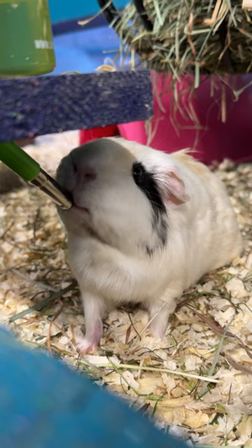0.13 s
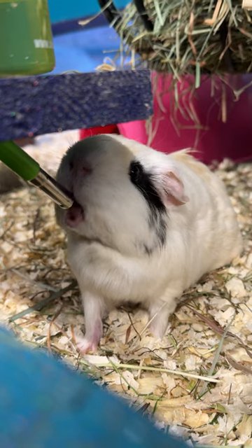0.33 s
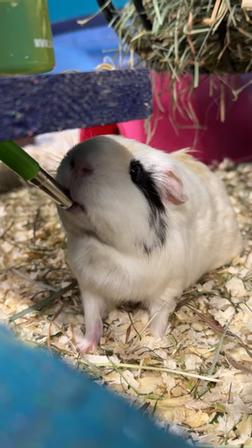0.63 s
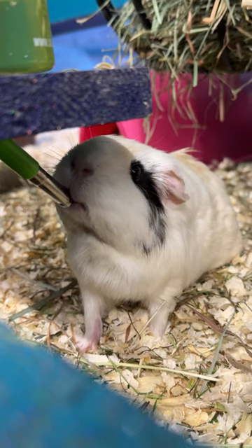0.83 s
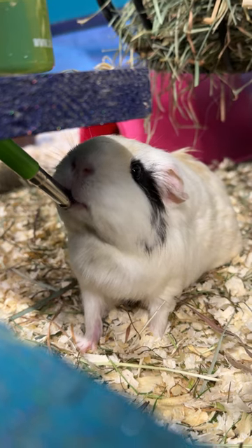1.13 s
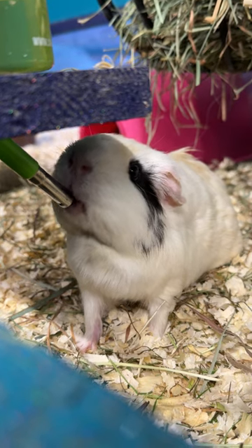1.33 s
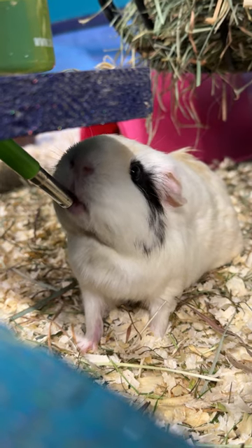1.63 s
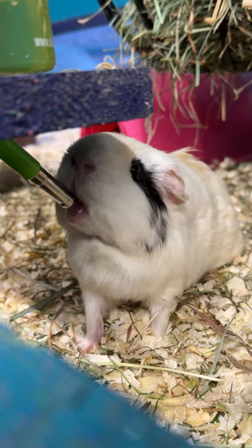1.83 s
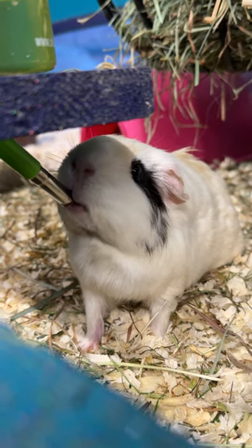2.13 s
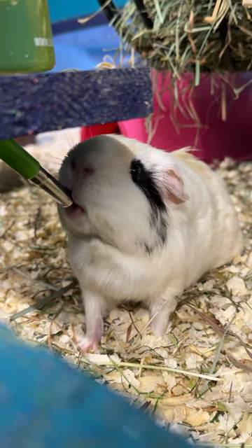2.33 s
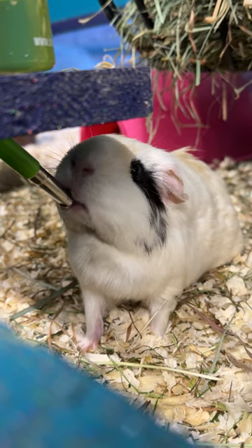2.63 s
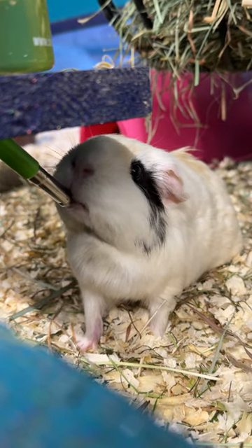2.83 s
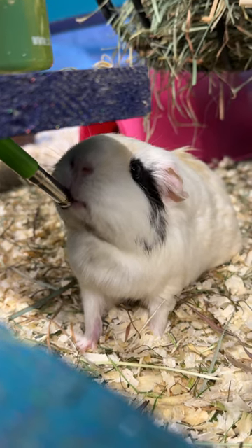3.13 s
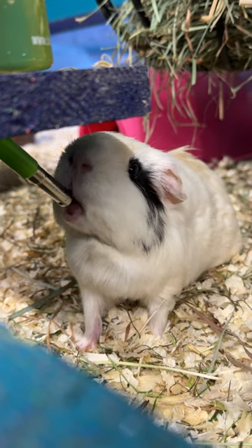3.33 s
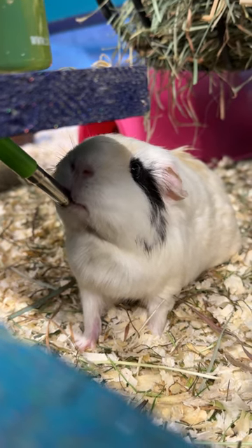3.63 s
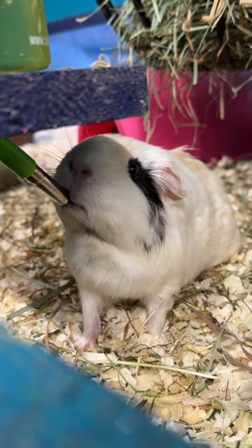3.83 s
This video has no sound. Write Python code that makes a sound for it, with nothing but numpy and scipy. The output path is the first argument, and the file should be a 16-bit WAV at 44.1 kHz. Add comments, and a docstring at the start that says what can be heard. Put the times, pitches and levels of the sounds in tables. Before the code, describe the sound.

Ball in a steel water spout snaps and rattles in uneven bursts, with late bumps nearby.

```python
"""Metallic clicks and rattles in bursts: a guinea pig drinks from a bottle in its cage, in a quiet room.
Each lick snaps the steel ball in the spout, which knocks the tube and rattles: noise cracks plus decaying sines.
The tongue's rubs and the bedding's rustles are coloured noise with tiny pops; the fan is narrow-band noise.
Dull bumps that reach the microphone, strongest near the end, are low sines with a noise thud."""
import sys
import numpy as np
from scipy import signal
from scipy.fft import rfft, irfft
from scipy.io import wavfile
from scipy.ndimage import uniform_filter1d

SR = 44100
rng = np.random.default_rng(int(sys.argv[2]) if len(sys.argv) > 2 else 0)


def transcribe(signal):
    """Save signal, clipped to [-1, 1], as a 16-bit WAV file at the path in sys.argv[1]."""
    frames = np.atleast_2d(signal).T
    limited = np.clip(frames, -1, 1)
    pcm = np.round(limited * 32767).astype(np.int16)
    wavfile.write(sys.argv[1], SR, pcm)


N = 176400
T_S = np.arange(N) / SR
HZ = np.fft.rfftfreq(N, 1 / SR) + 1e-6  # offset keeps log(HZ) finite

# Room air spectrum, shape only. Each row: frequency in Hz, gain in dB.
AIR_SHAPE = [(25,-13.5),(70,2.5),(200,-3),(360,-3),(620,-14),(1440,-23),(2550,-31),(6900,-37.5),(15000,-32.5)]
AIR_RMS_DB = -49.5
# Fan hums. Each row: centre in Hz, half-width at half gain in Hz, rms level in dB.
FAN_HUMS = [(189.6,13.3,-55),(300.3,1.85,-57.5),(343.6,3.2,-57.5)]
# Stereo width of diffuse sound. Each row: frequency in Hz, side over mid in dB.
SIDE_OVER_MID = [(50,-30),(250,-26.5),(500,-6),(1200,-7.5),(3500,-18.5),(12000,13)]
# Phase between the microphone ports. Each row: frequency in Hz, lead of the left in radians.
PORT_PHASE = [(5000,0),(6700,-1.3),(12400,-3.14),(16000,-4.1)]

# Bumps. Each row: start in seconds, boom in dB, overtone in dB (both before the swell), boom pitch in Hz.
BUMPS = [(0.624,-30,-37,47),(0.669,-29.5,-55,50.5),(.895,-36.5,-41,100),(0.976,-32.5,-63,53.5),(1.228,-50,-37,89.5),(3.709,-21.5,-31,80),(3.747,-14.5,-24.5,76),(3.81,-25,-38,78.5),(3.863,-19,-53,86.3),(3.944,-27.5,-58,83)]
# Thud spectrum, shape only. Each row: frequency in Hz, gain in dB.
THUD_SHAPE = [(20,-30),(52,14.5),(110,16),(270,-6),(900,-58)]
BUMP_RISE_S, BUMP_DECAY_S = 0.02, 0.033  # time constants
OVERTONE_HZ, THUD_RE_BOOM_DB = 191.5, -7

# Rustles of fur and bedding. Each row: start in seconds, level in dB before the swell, decay in seconds.
RUSTLES = [(2.058,-40,0.021),(2.087,-46,0.032),(2.187,-53,0.045),(2.985,-48,0.036),(3.012,-43.5,0.019),(3.193,-44,0.018),(3.221,-47,0.041),(3.678,-44,0.041),(3.729,-37,0.027),(3.811,-49,0.039)]
# Rustle spectrum, shape only. Each row: frequency in Hz, gain in dB.
RUSTLE_SHAPE = [(400,4),(1900,3.5),(2800,-1),(3900,4.5),(5500,-4),(16000,-3.5)]
# Scuffs. Each row: start in seconds, level in dB before the swell, decay in seconds, resonance in Hz.
SCUFFS = [(3.68,-44,0.02,1790),(3.707,-38,0.014,1240),(3.7287,-40.5,0.027,1770)]
RISE_PER_DECAY = 0.13
SCUFF_HALF_WIDTH_HZ, SCUFF_OVERTONE_RATIO, SCUFF_OVERTONE_DB = 310, 1.9, -10.5
# Pops in rustles, scuffs and rubs; level relative to the hiss.
POPS_PER_S, POPS_RE_HISS_DB, POP_T60_S = 190, -3.5, 0.009

# Tongue rubs along the spout. Each row: start in seconds, level in dB at mid-rub.
RUBS = [(0.203,-66.5),(.31,-73.5),(0.747,-61),(1.195,-57),(1.305,-56),(1.615,-59),(1.826,-60),(2.333,-59),(2.415,-56.5),(2.643,-59.5),(3.34,-58.5),(3.561,-58)]
RUB_S, RUB_HALF_WIDTH_HZ = 0.056, 120  # modes widen while the mouth damps them

# Clicks of ball and spout. Each row: start in seconds, gain of knock, ring and tick in dB.
CLICKS = [ (0.3992,-39,-35.5,-30.5),(.412,-35,-41.5,-35.5),(0.436,-36.5,-45,-43),(0.4579,-51,-39.5,-55),(0.4706,-43,-35.5,-39.5),(0.482,-60,-58,-48),
          (0.5326,-33.5,-39.5,-40),(0.539,-51,-44,-38),(0.5903,-42.5,-39.5,-50),(0.6133,-42.5,-43,-54),
          (0.7867,-38.5,-33.5,-31.5),(0.802,-36,-48,-46),(0.815,-40,-48.5,-48),(0.8574,-54,-46.5,-42),(0.902,-40.5,-46.5,-43),(0.9869,-45,-40.5,-50),
          (1.0609,-34.5,-36,-30.5),(1.0803,-39.5,-38,-34),(1.1069,-38.5,-41.5,-47),(1.117,-40,-41,-44),(1.1264,-36.5,-36,-43.5),(1.2988,-45,-46.5,-59),
          (1.3563,-34.5,-30.5,-29.5),(1.3716,-38,-40,-33),(1.3802,-34.5,-55,-56),(1.4134,-41,-54,-52),(1.42,-49,-44.5,-42),(1.4386,-44,-43,-40),(1.4481,-44,-42,-47),(1.545,-53,-47.5,-58),
          (1.6466,-34.5,-32,-29.5),(1.665,-36.5,-41,-32),(1.6696,-52,-42.5,-50),(1.6961,-37,-44,-51),(1.729,-37,-33.5,-42.5),(1.79,-44,-41.5,-54),
          (1.8842,-33.5,-32.5,-29.5),(1.9012,-31.5,-43.5,-33),(1.9052,-37.5,-51,-58),(1.9381,-40,-43.5,-50),(1.9669,-37,-34,-43.5),
          (2.451,-38.5,-33.5,-31.5),(2.467,-37.5,-55,-58),(2.4869,-36.5,-42,-46),(2.5098,-45.5,-42,-52),(2.5189,-46,-40.5,-35),(2.5899,-39.5,-41.5,-40),
          (2.811,-38.5,-37,-29.5),(2.83,-32,-40.5,-37),(2.8688,-41.5,-41,-49),(2.8809,-42,-38.5,-37),(2.9088,-49,-50,-65),(2.9748,-41,-44,-44.5),
          (3.0546,-35,-35,-30.5),(3.0715,-33.5,-40,-36),(3.1086,-45,-43.5,-48),(3.1175,-38.5,-37,-42.5),(3.1291,-41,-39.5,-39.5),(3.1536,-47.5,-46.5,-61),(3.3111,-48,-46,-59),
          (3.3892,-35,-33,-29.5),(3.4059,-36.5,-39.5,-33.5),(3.4542,-40.5,-37.5,-49),(3.4677,-38.5,-36,-46),(3.4908,-46,-44,-48)]
# Registers: knock, ring, tick. Each row: upper edge in Hz, rise time constant in seconds, crack in dB,
# crack t60 in seconds, cage echo in dB, cage echo t60 in seconds. Levels are relative to the click gain.
REGISTERS = [(1860,0.00076,-4.5,0.025,-9,0.22),(5720,0.00076,3,0.018,-8,0.11),(14700,0.00066,13,0.0076,-0.5,0.034)]
# Crack spectrum, shape only. Each row: frequency in Hz, gain in dB.
CRACK_SHAPE = [(350,9.5),(700,5),(4200,-1.5),(4700,-5),(6500,-4),(9500,3.5),(12300,4.5),(14000,3)]
# Modes of bottle and spout. Each row: mean pitch in Hz, level in dB relative to the other modes, t60 in seconds.
MODES = [(722,-6.5,0.037),(920,-15,0.097),(1192,-6,0.039),(1436,-2.5,0.036),(1585,-8,0.027),(2072,-16.5,0.054),(2324,-8,0.037),(2915,-1,0.019),(3230,-11,0.019),(3767,-8,0.031),(4077,-6.5,0.035)]
MODES_GAIN_DB = 3.5
# The ball never strikes the same spot twice: standard deviations per strike.
MODE_SCATTER_DB, MODE_DETUNE_SHARE, TUBE_DETUNE_SHARE = 3, 0.018, 0.01
TUBE_MEAN_HZ, TUBE_MEAN_DB, TUBE_T60_S = 3080, -11.5, 0.14  # long ring of the steel tube
# A light touch precedes each click whose tick exceeds SNAP_DB.
SNAP_DB, TOUCH_LEAD_S, TOUCH_DB = -31.5, 0.0044, -12.5
BOUNCE_MAX_GAP_S, BOUNCE_STEP_DB = 0.008, -9.5
LAG_MAX_S, LAG_SCALE_HZ = 0.00781, 848.2
ROOM_DB, ROOM_T60_S = -28, 0.42
TOP_HZ = 16100


def amp(db):
    """Decibels to gain."""
    return 10 ** (np.asarray(db) / 20)


def curve(points):
    """Gain over HZ from (Hz, dB) points, interpolated on log frequency."""
    hz, db = np.array(points, float).T
    return amp(np.interp(np.log(HZ), np.log(hz), db))


def noise(gain):
    """Noise of unit power with the given spectrum."""
    x = irfft(rfft(rng.standard_normal(N)) * gain, N)
    return x / x.std()


def swell(start_s, rise_s, decay_s):
    """Envelope that rises and dies away exponentially."""
    age_s = np.maximum(T_S - start_s, 0)
    return (1 - np.exp(-age_s / rise_s)) * np.exp(-age_s / decay_s)


def fade(t_s, t60_s):
    """Exponential fall of 60 dB in t60_s."""
    return np.exp(-np.log(1000) * t_s / t60_s)


def add(out, x, start_s):
    """Mix a short sound in at its time."""
    i = int(start_s * SR)
    out[..., i:i + x.shape[-1]] += x[..., :N - i]


def below(hz):
    """Share of the power under a soft crossover."""
    return hz ** 10 / (hz ** 10 + HZ ** 10)


def resonance(hz, half_width_hz):
    """Complex gain of one resonance over HZ."""
    return 1 / (1 + 1j * (HZ - hz) / half_width_hz)


def friction(gain):
    """Rubbing surfaces: a hiss with tiny pops of uneven size, both in the given colour."""
    hits = (rng.random(N) < POPS_PER_S / SR) * rng.standard_normal(N)
    t_s = T_S[:SR // 20]
    pop = fade(t_s, POP_T60_S) * rng.standard_normal(len(t_s))
    pops = signal.fftconvolve(hits, pop)[:N]
    pops = irfft(rfft(pops) * gain, N)
    pops_gain = amp(POPS_RE_HISS_DB)
    return (noise(gain) + pops_gain * pops / pops.std()) / np.hypot(1, pops_gain)


def diffuse(mid, side):
    """Sound from all around: alike in both ears in the bass, wide in the upper treble."""
    share = curve(SIDE_OVER_MID)
    m, s = rfft(mid), rfft(side) * share
    return irfft(np.array([m + s, m - s]) / np.hypot(1, share), N)


def ports(x):
    """The treble reaches the two microphone ports out of step."""
    turn = np.interp(HZ, *np.array(PORT_PHASE, float).T)
    return irfft(rfft(x) * np.exp(1j * np.array([turn, -turn]) / 2), N)


def air():
    """One channel of steady broadband air noise plus narrow fan hums."""
    out = amp(AIR_RMS_DB) * noise(curve(AIR_SHAPE))
    for hz, half_width_hz, db in FAN_HUMS:
        out += amp(db) * noise(1 / (1 + ((HZ - hz) / half_width_hz) ** 2))
    return out


def room():
    """Room air and fan as a diffuse field, from independent mid and side noise."""
    return diffuse(air(), air())


def bumps():
    """Soft blows: a low boom with a dull thud, and an overtone."""
    out = np.zeros(N)
    thud = amp(THUD_RE_BOOM_DB) * noise(curve(THUD_SHAPE))
    for start_s, boom_db, overtone_db, hz in BUMPS:
        turn = 2 * np.pi * (T_S - start_s)
        boom = amp(boom_db) * (np.sin(hz * turn) + thud)
        overtone = amp(overtone_db) * np.sin(OVERTONE_HZ * turn)
        out += swell(start_s, BUMP_RISE_S, BUMP_DECAY_S) * (boom + overtone)
    return out


def stroke(start_s, db, decay_s):
    """Level envelope of one rustle or scuff."""
    return amp(db) * swell(start_s, RISE_PER_DECAY * decay_s, decay_s)


def bedding():
    """Short crackly rustles, and scuffs that each ring at their own pitch and weakly above it."""
    out = sum(stroke(*row) for row in RUSTLES) * friction(curve(RUSTLE_SHAPE))
    for start_s, db, decay_s, hz in SCUFFS:
        main = resonance(hz, SCUFF_HALF_WIDTH_HZ) ** 2
        upper = resonance(SCUFF_OVERTONE_RATIO * hz, SCUFF_HALF_WIDTH_HZ) ** 2
        colour = main + amp(SCUFF_OVERTONE_DB) * upper
        out = out + stroke(start_s, db, decay_s) * friction(colour)
    return ports(out)


def tongue():
    """Soft rubs that swell and fade in the damped modes of the spout."""
    power = sum(np.abs(amp(db) * resonance(hz, RUB_HALF_WIDTH_HZ)) ** 2 for hz, db, _ in MODES)
    pressure = np.zeros(N)
    for start_s, db in RUBS:
        pressure += amp(db) * np.sin(np.pi * np.clip((T_S - start_s) / RUB_S, 0, 1))
    return ports(pressure * friction(np.sqrt(power)))


def late_lows(x):
    """Low notes build up late, by up to LAG_MAX_S, so each knock slides down."""
    phase = 2 * np.pi * LAG_MAX_S * LAG_SCALE_HZ * np.exp(-HZ / LAG_SCALE_HZ)
    return irfft(rfft(x) * np.exp(1j * phase), N)


def ringing(low_hz, high_hz):
    """Decaying modes within one register, struck a little differently each time."""
    t_s = T_S[:SR // 14]
    out = np.zeros(len(t_s))
    scatter = rng.standard_normal((len(MODES), 3))
    for (hz, db, t60_s), (size, detune, phase) in zip(MODES, scatter):
        if low_hz < hz <= high_hz:
            gain = amp(MODES_GAIN_DB + db + MODE_SCATTER_DB * size)
            struck_hz = hz * (1 + MODE_DETUNE_SHARE * detune)
            out += gain * fade(t_s, t60_s) * np.sin(2 * np.pi * (struck_hz * t_s + phase))
    return out


def tube_ring(t_s, phase):
    """One long decaying sine of the steel tube, scattered in level and pitch."""
    gain = amp(TUBE_MEAN_DB + MODE_SCATTER_DB * rng.standard_normal())
    hz = TUBE_MEAN_HZ * (1 + TUBE_DETUNE_SHARE * rng.standard_normal())
    return gain * fade(t_s, TUBE_T60_S) * np.sin(2 * np.pi * (hz * t_s + phase))


def chatter(tick, grit, count):
    """The ball bounces at uneven gaps, weaker each time."""
    out, start_s = np.zeros(N), 0
    for bounce in range(1, count + 1):
        start_s += BOUNCE_MAX_GAP_S * (1 + rng.random()) / 2
        at = rng.integers(N - len(tick))
        add(out, amp(BOUNCE_STEP_DB * bounce) * tick * grit[at:at + len(tick)], start_s)
    return out[:len(tick)]


def spout():
    """Each click is a crack plus ringing modes, echoed by the cage and then the room."""
    t_s = T_S[:SR // 3]
    near, far, low_hz = np.zeros(N), np.zeros((2, N)), 0
    for k, (high_hz, rise_s, crack_db, crack_t60_s, cage_db, cage_t60_s) in enumerate(REGISTERS):
        band = curve(CRACK_SHAPE) * np.sqrt(np.abs(below(high_hz) - below(low_hz)))
        grit = noise(band)
        walls = np.array([noise(band), noise(band)])
        attack = 1 - np.exp(-t_s / rise_s)
        crack = amp(crack_db) * fade(t_s, crack_t60_s)
        cage = amp(cage_db) * fade(t_s, cage_t60_s)
        burst = np.hypot(crack, cage)
        tail = amp(ROOM_DB) * attack * fade(t_s, ROOM_T60_S)
        mid_side = np.array([tail, np.hypot(tail, cage)])
        for start_s, *levels_db in CLICKS:
            at, phase = rng.integers(N - len(t_s)), rng.random()
            gain = amp(levels_db[k]) * attack
            echo = walls[:, at:at + len(t_s)]
            click = burst * grit[at:at + len(t_s)]
            add(click, ringing(low_hz, high_hz), 0)
            if k == 1:  # ring
                click += tube_ring(t_s, phase)
            add(near, gain * click, start_s)
            if levels_db[-1] > SNAP_DB:
                add(near, amp(TOUCH_DB) * gain * crack * echo[0], start_s - TOUCH_LEAD_S)
            if k == 2:  # tick
                add(near, chatter(gain * crack, grit, count=3), start_s)
            add(far, gain * mid_side * echo, start_s)
        low_hz = high_hz
    return ports(late_lows(near)) + diffuse(*far)


def scene():
    """Room, bumps, bedding, tongue and spout, summed."""
    return room() + bumps() + bedding() + tongue() + spout()


def record(dry):
    """Steep elliptic low-pass: cuts the top above TOP_HZ."""
    sos = signal.ellip(8, 0.2, 70, TOP_HZ, fs=SR, output="sos")
    return signal.sosfilt(sos, dry)


dry = scene()
out = record(dry)
transcribe(out)
```